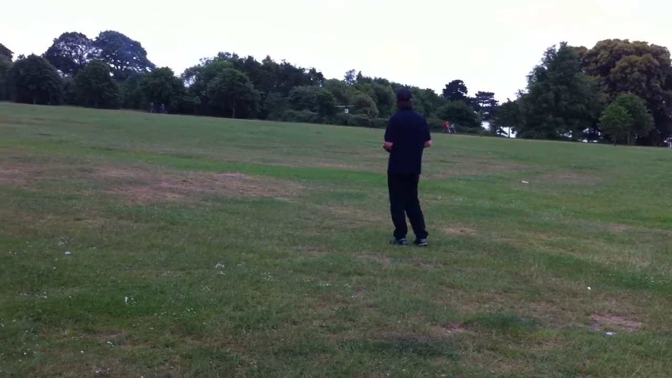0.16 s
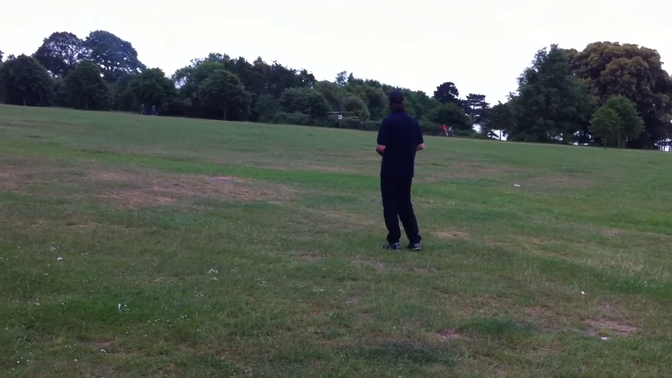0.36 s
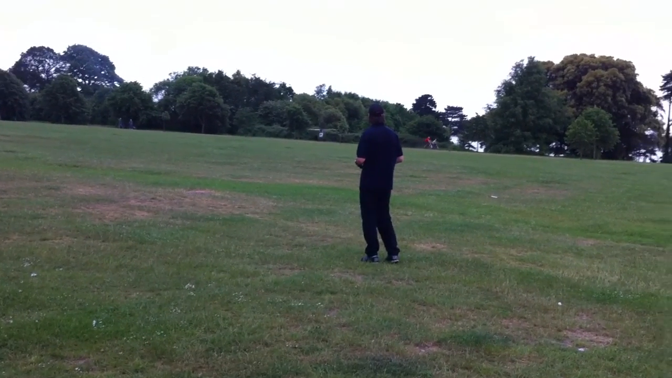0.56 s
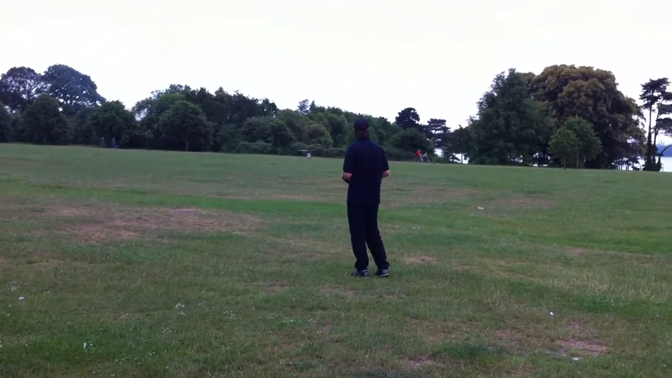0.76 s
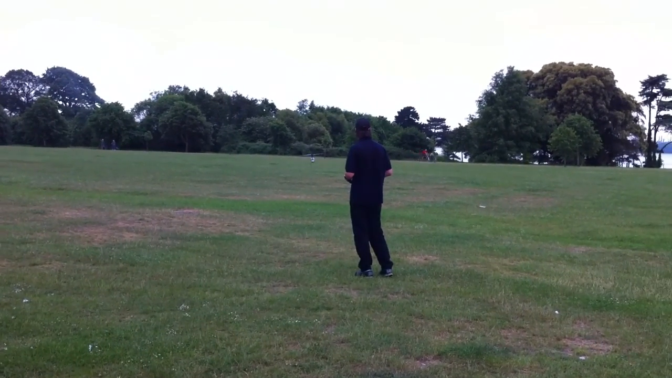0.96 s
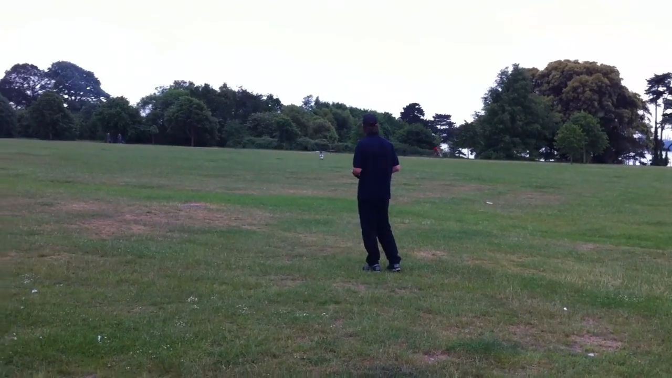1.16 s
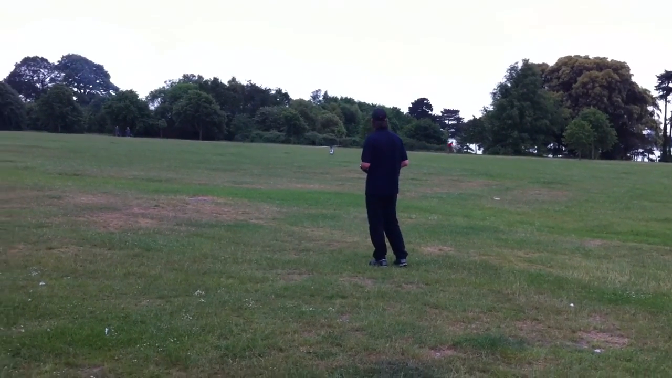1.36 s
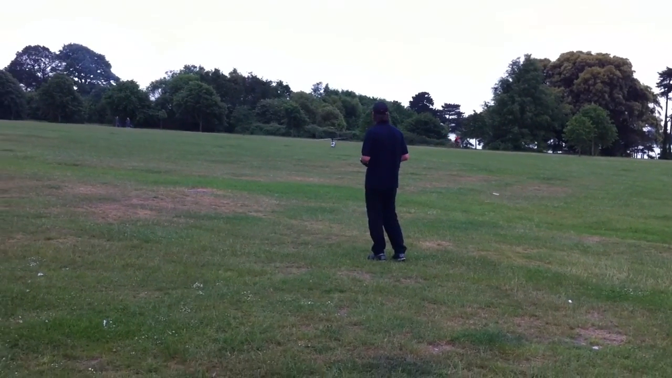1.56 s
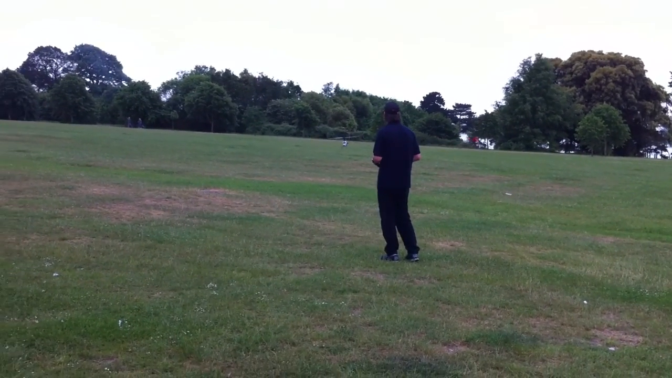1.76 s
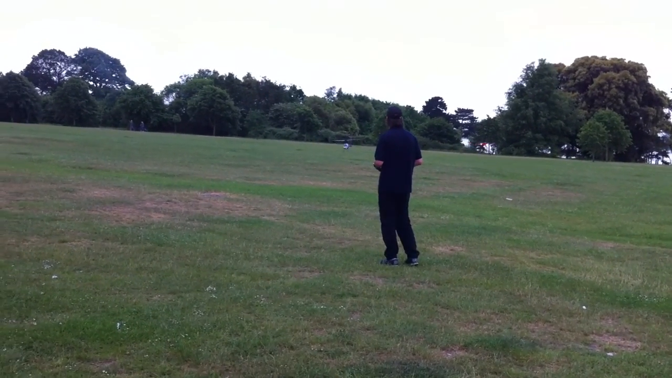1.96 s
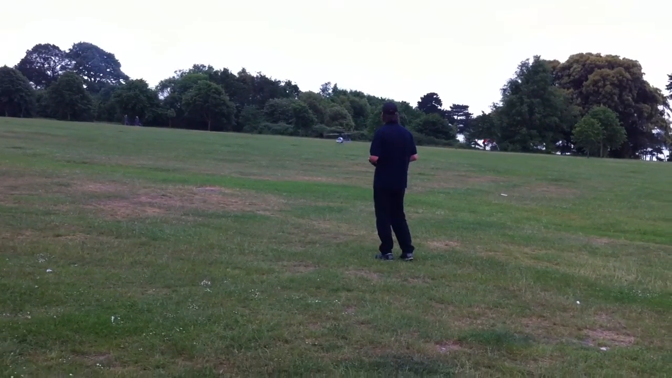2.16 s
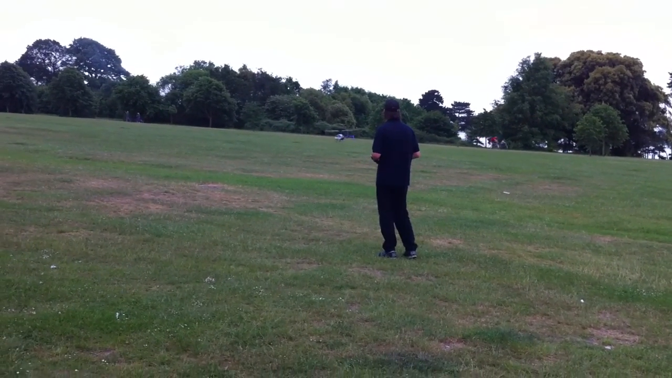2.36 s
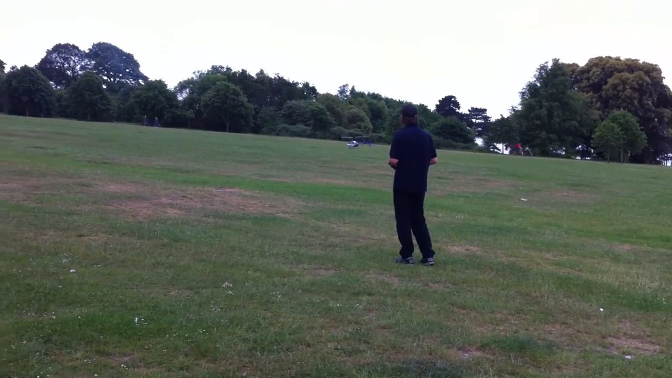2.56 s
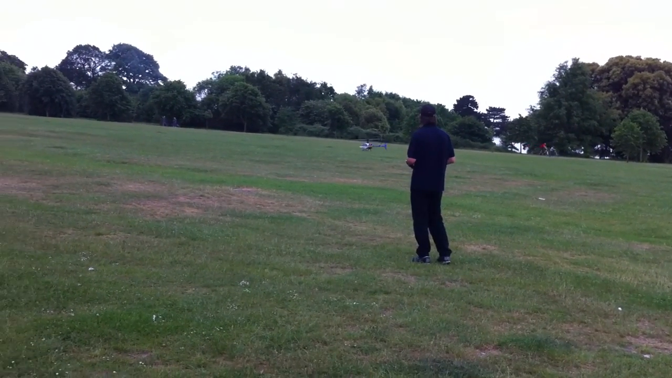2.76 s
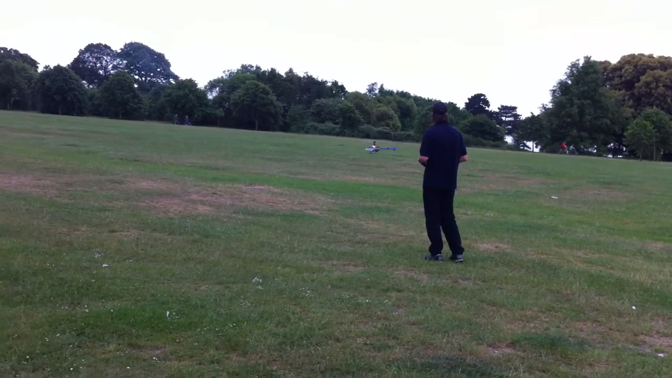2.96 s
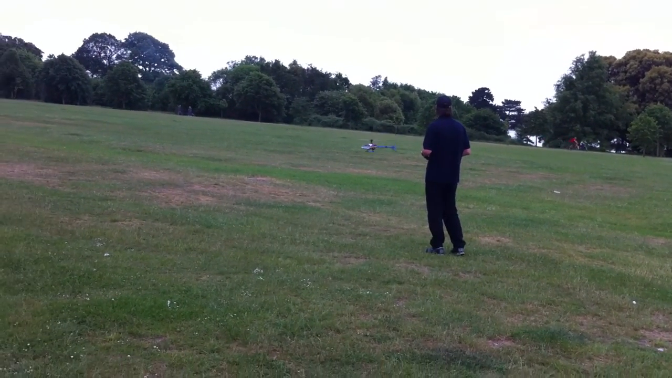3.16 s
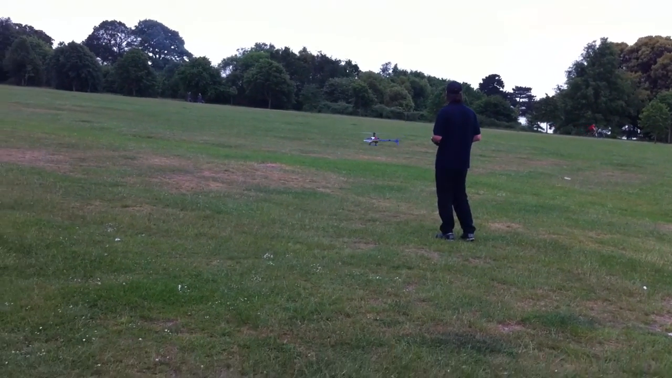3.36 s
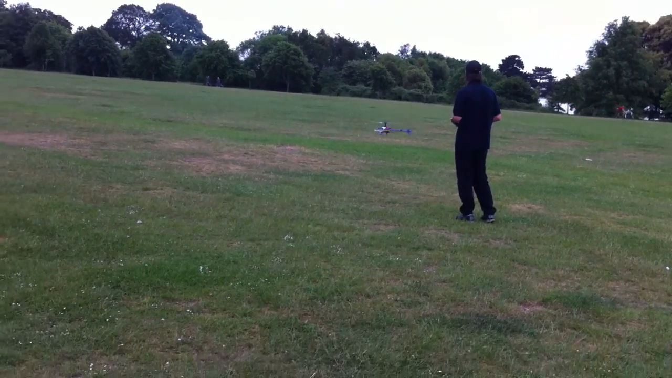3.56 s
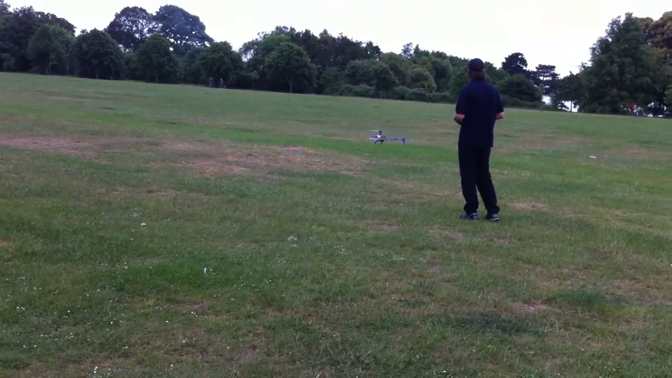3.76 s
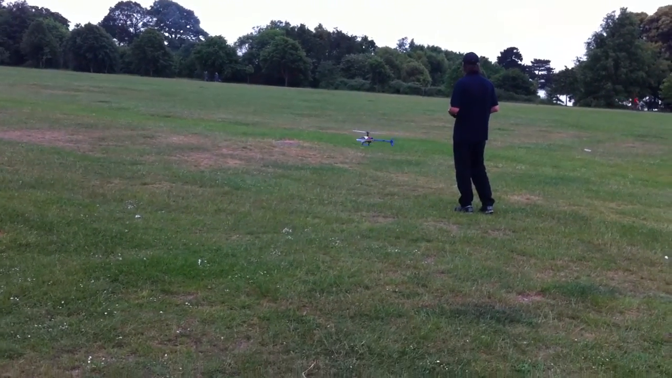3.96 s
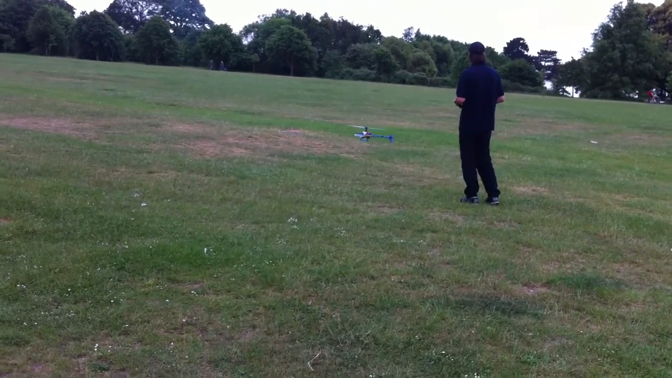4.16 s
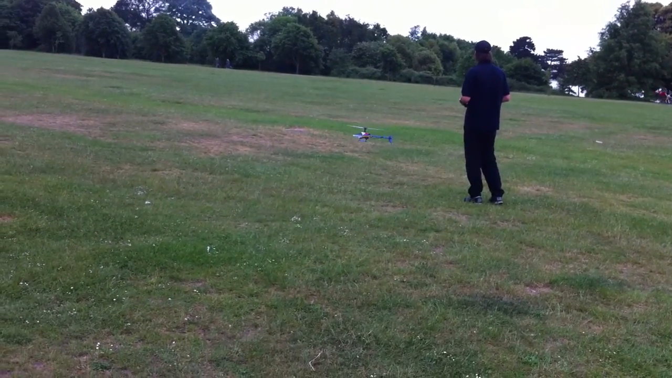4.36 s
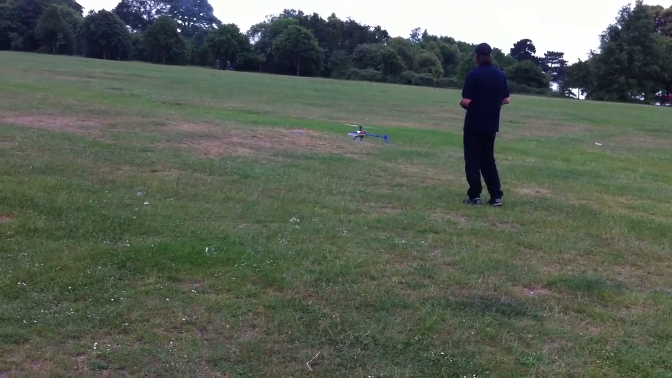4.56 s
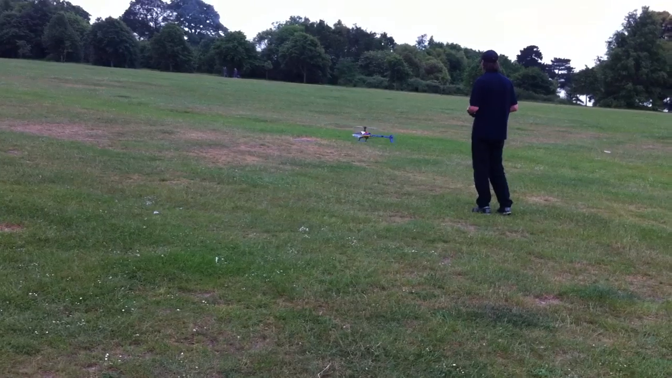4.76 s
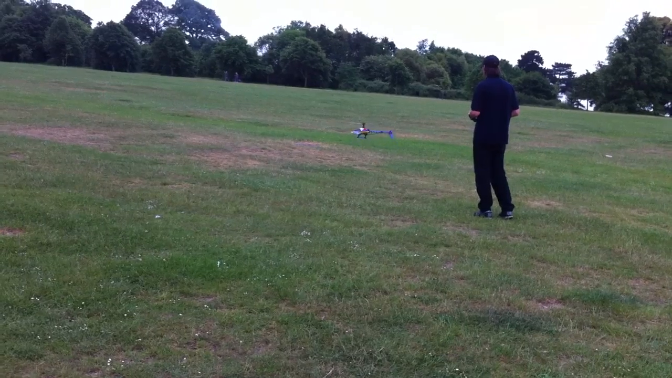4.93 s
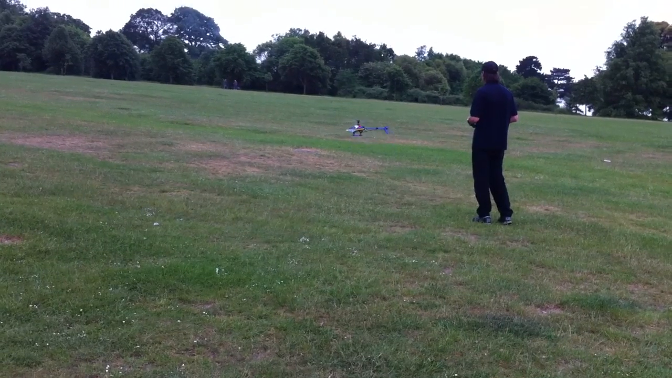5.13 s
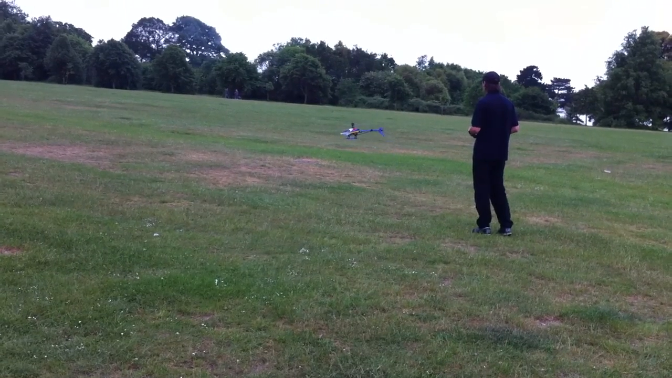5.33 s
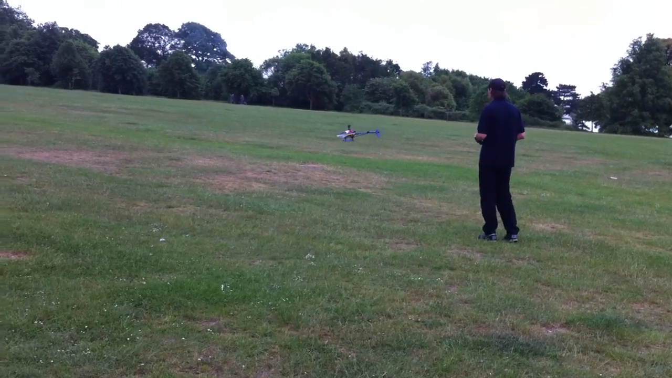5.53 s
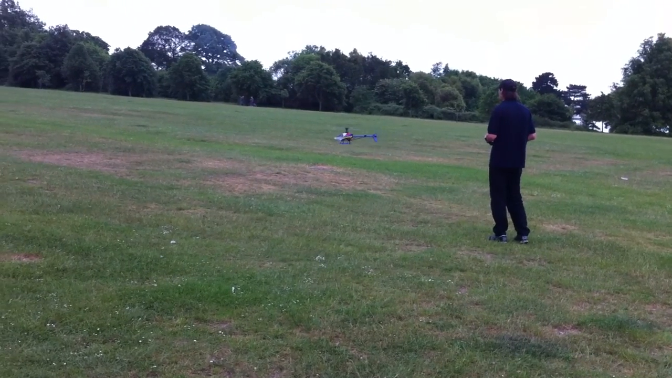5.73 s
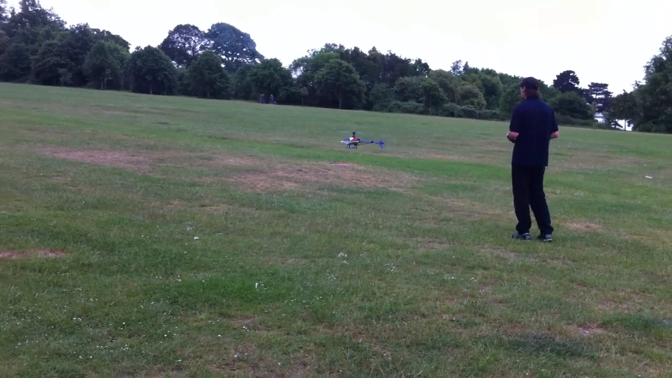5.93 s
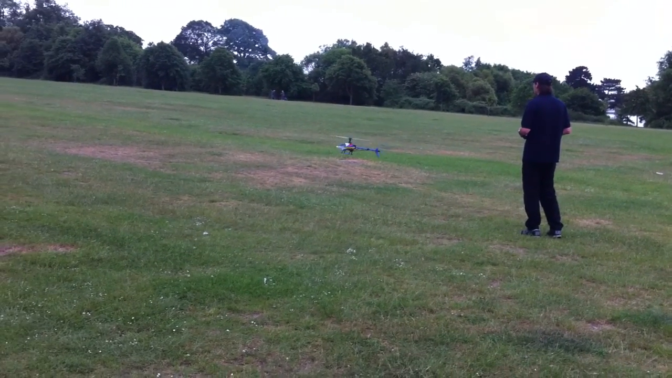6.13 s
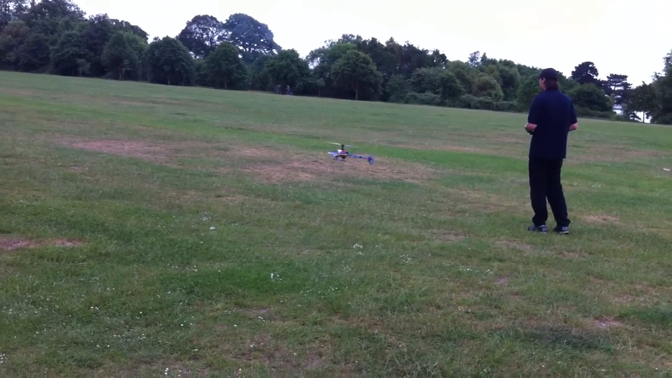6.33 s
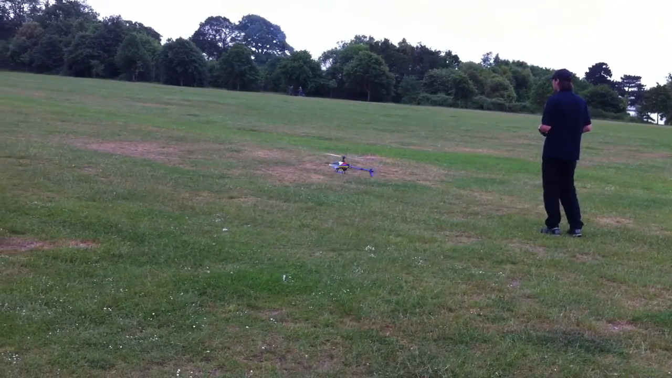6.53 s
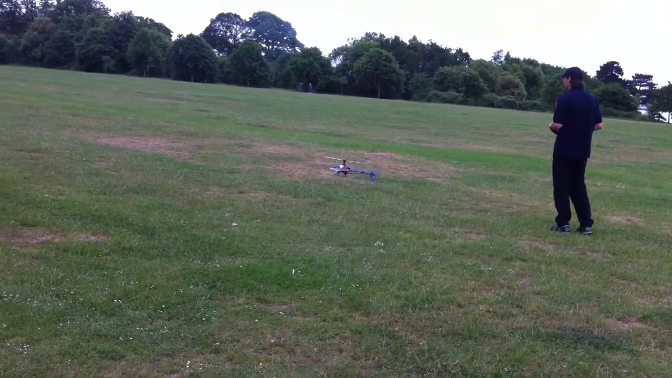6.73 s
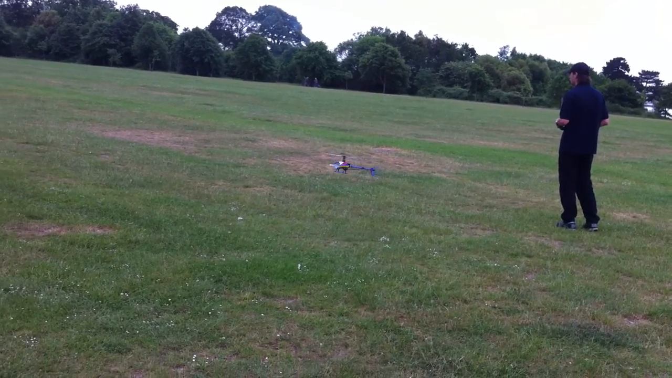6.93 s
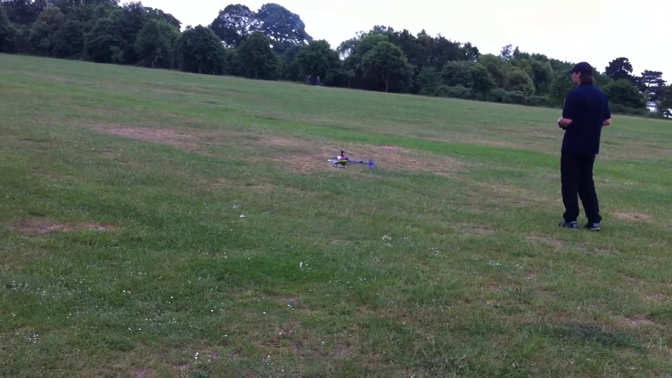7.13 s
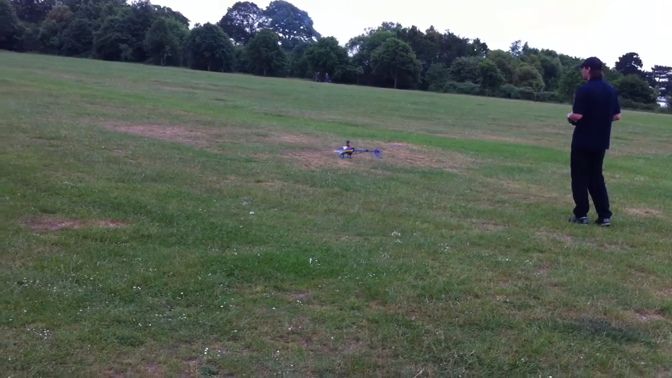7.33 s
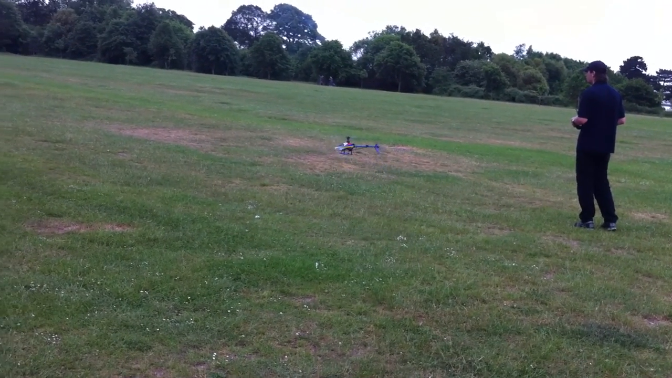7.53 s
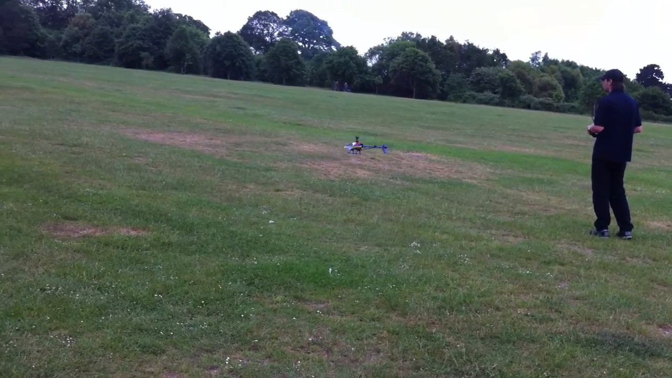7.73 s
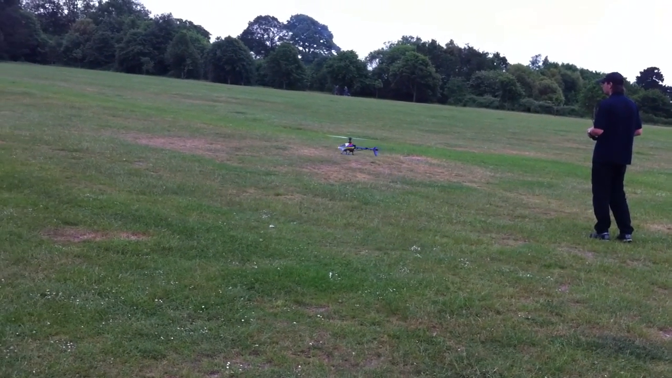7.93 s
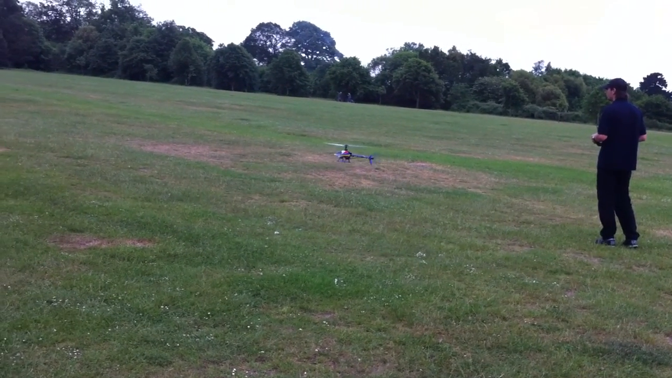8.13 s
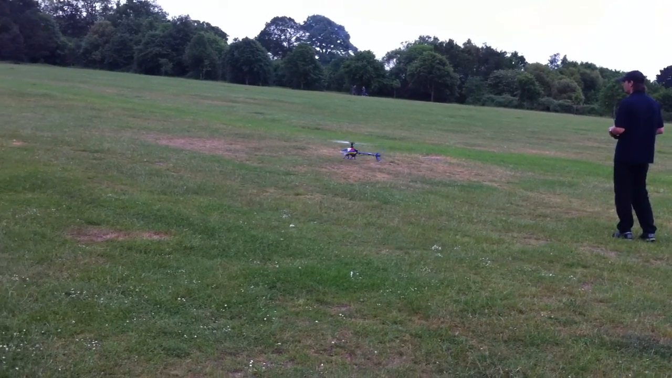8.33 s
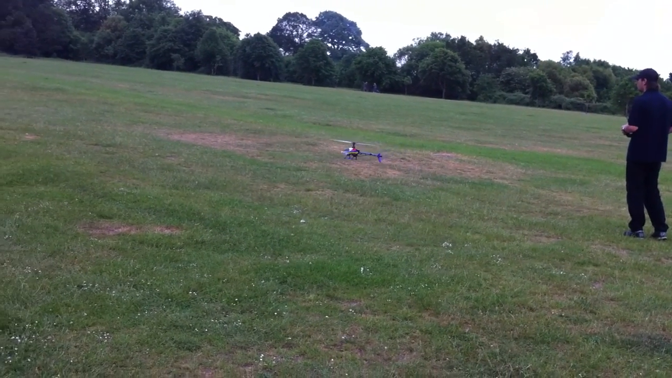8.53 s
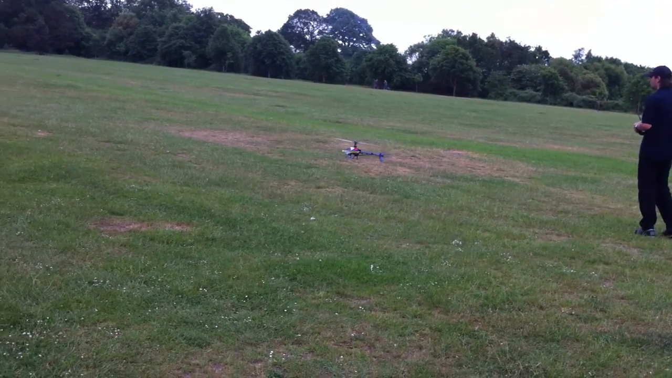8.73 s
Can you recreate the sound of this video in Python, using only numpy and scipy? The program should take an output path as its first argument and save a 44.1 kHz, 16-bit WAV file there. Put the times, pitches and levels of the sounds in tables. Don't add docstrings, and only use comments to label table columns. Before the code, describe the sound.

In an open park, a small electric model helicopter approaches and hovers. Its thin gear and motor whine starts distant and swells over several seconds, pitch wavering slightly, with rapid fluttering blade whistle, tail swish and dry gear rattle. Low far traffic lies underneath and a bird calls faintly near the start. A small handheld microphone gives a thin, slightly hollow sound.

```python
import sys
import numpy as np
from scipy import signal
from scipy.fft import rfft, irfft, next_fast_len
from scipy.io import wavfile
from scipy.ndimage import uniform_filter1d, map_coordinates

SR = 44100
rng = np.random.default_rng(int(sys.argv[2]) if len(sys.argv) > 2 else 0)


def boost(x):
    u = np.asarray(x, float) / 20
    return 10 ** u


def int16_out(signal):
    q = np.round(np.clip(np.atleast_2d(signal).T, -1, 1) * 32767)
    wavfile.write(sys.argv[1], SR, q.astype(np.int16))


N = 387638
T = np.arange(N) / SR

# (time [s], speed [turns/s], angle at which a blade points this way [turns])
ROTOR = [(0.0, 40.49, -0.068), (0.73, 40.36, -0.081), (1.05, 40.92, -0.07), (1.39, 41.12, -0.068),
         (2.11, 41.08, -0.103), (2.43, 40.5, -0.148), (3.21, 39.97, -0.248), (3.65, 40.27, -0.286),
         (3.96, 40.76, -0.27), (4.47, 41.25, -0.294), (4.83, 41.33, -0.298), (5.21, 40.64, -0.306),
         (5.97, 39.6, -0.308), (6.64, 40.67, -0.268), (7.32, 40.78, -0.311), (7.78, 40.66, -0.335),
         (8.14, 40.15, -0.335), (8.79, 40.32, -0.293)]
# (time [s], nearness [dB], 0 = closest)
NEARNESS = [(0, -12.5), (1, -9.5), (2, -9), (2.7, -4.5), (3.3, -2), (4.6, -1.5), (5.7, 1), (7, 0),
            (7.7, 0.86), (8.79, 0.5)]

ORDERS = {"tail": 5, "tail blades": 10, "tail buzz": 30, "tail third": 15, "tail fourth": 20,
          "tail rasp": 40, "tail sing": 200, "belt": 27,
          "motor": 14, "poles": 42, "slots": 56, "switching": 280, "switching low": 262,
          "mesh": 110, "mesh wobble": 111, "mesh less tail": 105, "mesh low": 104,
          "pinion low": 128, "pinion": 134, "pinion high": 140, "pinion top": 146}
TONES = {"tail": (-60.5, 1.13), "tail blades": (-62.5, 0.4), "tail buzz": (-74.5, 1.25),
         "tail third": (-77.5, 0.77), "tail fourth": (-75.5, 0.15), "tail rasp": (-67, 2.05),
         "tail sing": (-76, 1.1), "belt": (-78.5, 0.79),
         "motor": (-70, 1), "poles": (-67, 1.5), "slots": (-72, 2),
         "switching": (-62, 1.4), "switching low": (-68.5, 0.7),
         "mesh": (-49.5, 1.13), "mesh wobble": (-58.5, 0.86), "mesh less tail": (-64, 2.2),
         "mesh low": (-67, 0.55), "pinion low": (-56, 0.8), "pinion": (-55.5, 0.92),
         "pinion high": (-60.5, 0.47), "pinion top": (-65, 0.24)}
# (order [per turn], order followed [per turn], level relative to it [dB])
SIDEBANDS = [(12, 5, -18), (19, 10, -14), (28, 10, -14), (84, 42, -3), (115, 110, -14), (116, 110, -11),
             (109, 110, -18), (98, 110, -20), (286, 280, -8), (274, 280, -3)]
DRIVE_LOBES = {
    "tail": [(2.28, 0.89, -6.5), (5.65, 0.64, -4)],
    "tail blades": [(3.02, 0.6, -4), (5.7, 0.45, -10), (7.5, 0.29, -9.5), (8.5, 0.45, -11.5)],
    "tail buzz": [(2.9, 0.71, 9), (3.6, 0.32, 10.5), (5.3, 0.76, 13), (6.15, 0.28, 6),
                  (7.06, 0.33, -20), (8.48, 1, -39)],
    "motor": [(3.15, 0.9, -15), (6.11, 0.65, -12), (8.23, 0.46, -7)],
    "poles": [(1.28, 0.46, 6.5), (2.27, 0.15, -2), (3.65, 0.37, 5), (4.5, 0.28, -11), (7.96, 0.85, 3)],
    "slots": [(4.5, 0.99, 19), (6.67, 0.26, 14.5), (7.61, 0.58, 14.5), (8.7, 0.1, 15)],
    "switching": [(2.92, 0.12, -12.6), (4.4, 0.6, 2), (5.7, 0.3, -11), (8.33, 0.14, 1)]}
GEAR_LOBES = {
    "mesh": [(1.28, 0.31, -16), (2.5, 0.51, 6), (3.23, 0.25, -16.5), (4.1, 0.21, -8),
             (4.9, 0.19, -3.6), (6.47, 0.092, 5), (7.4, 0.13, -7)],
    "pinion low": [(0.35, 0.33, -23), (3.03, 0.42, -27), (5.72, 0.29, -5.9), (7.33, 0.12, -13),
                   (8.1, 0.16, -19)],
    "pinion": [(1.24, 0.087, -4), (2.9, 0.21, -21), (3.9, 0.17, 5), (4.57, 0.28, -3),
               (5.7, 0.25, -6), (6.7, 0.62, -8)],
    "pinion high": [(0.9, 0.13, -13), (1.95, 0.24, -4), (3.7, 0.42, -19), (4.9, 0.43, -12),
                    (8.28, 0.32, 5)]}
PARTNER_LOBES = {
    "mesh wobble": [(0.3, 0.65, 3), (1.3, 0.3, -12), (3.3, 0.24, -15), (4.4, 0.72, -18),
                    (7.3, 0.2, -13), (8.3, 0.94, 5.5)],
    "mesh less tail": [(2.3, 0.52, 19), (7.3, 0.92, 7)],
    "pinion top": [(1.6, 0.34, -10), (2.7, 0.4, 2), (4.7, 0.4, -6), (8.4, 0.4, 7)],
    "tail sing": [(2.9, 0.35, 18)],
    "tail third": [(4.6, 0.28, 4), (7.6, 1.2, 7.3)],
    "tail fourth": [(4.5, 0.36, 8.3), (5.6, 0.5, 6.9), (7.1, 0.33, 4.3)],
    "switching low": [(3.5, 0.8, -6), (5.4, 0.4, 5)],
    "mesh low": [(3.6, 0.64, -10), (4.6, 0.2, 7)],
    "belt": [(5.85, 0.4, 10.5)],
    "tail rasp": [(2.75, 0.28, 7), (3.6, 0.35, 11), (4.55, 0.25, -4)]}

# (time [s], blade load [dB], second blade over first [dB])
TIP_LOAD = [(0, 0, 5), (.6, 0, 5), (1, 3, 6), (1.7, 3.5, 5), (2.3, 2.5, 2.5), (3.1, -3.5, 10), (4, -.5, 6),
            (4.35, -1, 6), (4.75, 2.5, 6), (5.05, -1, 6), (5.5, 2, 4), (6, -2.5, 6), (6.4, -5, 7),
            (6.9, -2.5, 10), (7.35, 2, 6), (7.8, 1.5, 2), (8.25, -11.5, 7), (8.79, -4, 8)]
# (frequency on blade [Hz], width [Hz], level [dB])
FIRST_BLADE = [
    (9430, 97, -20),
    (9250, 500, -3),
]
# (frequency on blade [Hz], width [Hz], level [dB])
SECOND_BLADE = [
    (10000, 61.6, 3),
    (9620, 100, -3),
    (8820, 500, 0.5),
]
# (frequency [Hz], level [dB])
TIP_SPECTRUM = [(6300, -30.5), (9400, -23), (11000, -15.5), (12000, -21), (12500, -4.5), (14100, -2.5),
                (15000, -10), (15400, -12), (16000, -28)]

# (frequency [Hz], density [dB/Hz])
SWISH_SPECTRUM = [(410, -37), (700, -49), (803, -17), (1030, -13), (2310, -3.5), (2670, -8), (2900, -23),
                  (3770, -50), (6380, -120)]
# (frequency [Hz], density [dB/Hz])
RATTLE_SPECTRUM = [(1650, -90), (2800, -8.5), (3320, -7), (4420, -2.5), (5550, -7), (5970, -10.5),
                   (6310, -39), (6400, -40), (8320, -46), (14100, -120)]
# (frequency [Hz], density [dB/Hz])
AIRFLOW_SPECTRUM = [(5500, -32), (6300, -12), (6900, -9.5), (7800, -5), (9300, -5), (10400, -2.5),
                    (11500, 0), (12300, -6.5), (14000, -26), (16000, -75)]
# (time [s], half length [s], swish [dB], rattle [dB])
STEERING = [
    (2.5, 0.28, 5.5, 0),
    (3.3, 0.25, -2, 0.5),
    (3.806, 0.36, 2, 1),
    (4.497, 0.27, -1.5, 3),
    (5.85, 0.2, -1, -1.5),
    (6.55, 0.26, 3, 0.5),
    (6.97, 0.2, -2.5, 4),
    (7.7, 0.39, 0.5, -1.5),
    (8.146, 0.22, -1, 1),
]
# (time [s], delay [ms], strength [0-1])
GROUND = [(0, .825, .7), (.5, .78, .7), (.9, .703, .8), (1.1, .679, .85), (1.35, .666, .9),
          (1.6, .677, .82), (1.9, .713, .66), (2.4, .8, .25), (3, .85, .25), (3.3, .78, .4), (3.9, .42, .6),
          (4.2, .32, .6), (4.5, .275, .6), (4.8, .35, .5), (5.5, .86, .28), (6.1, .93, .2), (7, .7, .25),
          (8.79, .8, .2)]

# (time [s], level [dB])
TRAFFIC = [
    (0, -62.5),
    (3, -60.5),
    (4.5, -58.5),
    (8.79, -59.5),
]
# (frequency [Hz], density [dB/Hz])
PARK_SPECTRUM = [(20, -17), (50, -18), (80, -10.5), (165, 0), (250, -8), (340, -11), (800, -13),
                 (2000, -16), (2800, -26.5), (6000, -14.5), (16000, -58)]
# (time [s], length [s], start [Hz], end [Hz], level [dB])
BIRD = [
    (1.13, 0.15, 1920, 2180, -66),
    (1.37, .14, 2030, 1940, -67),
    (2.286, 0.18, 2120, 2030, -75),
]
# (frequency [Hz], half width [Hz], level [dB])
NOTCHES = [
    (2806, 308, -11.5),
    (6140, 170, -5.5),
    (6400, 75, -7),
    (9280, 146, -6.5),
    (11950, 120, -3),
    (12420, 225, -0.5),
]


def unit(x):
    return x / np.sqrt(np.mean(np.abs(x) ** 2) + 1e-20)


def curves(rows):
    time_s, *columns = np.transpose(rows)
    return [np.interp(T, time_s, column) for column in columns]


def wobble(rate_hz):
    knots = int(N * rate_hz / SR) + 4
    return np.interp(T * rate_hz, np.arange(knots), rng.standard_normal(knots))


def swells_db(rows, column=2):
    return sum(row[column] * np.exp(-((T - row[0]) / row[1]) ** 2) for row in rows)


def coloured(x, spectrum):
    m = next_fast_len(N + 8192)
    hz, db = np.transpose(spectrum)
    log_bins = np.log(np.fft.rfftfreq(m, 1 / SR) + 1)
    gain_db = np.interp(log_bins, np.log(hz + 1), db)
    return irfft(rfft(x, m) * boost(gain_db), m)[:N]


def patchy(patchy_db):
    z = signal.stft(rng.standard_normal(N), nperseg=512)[2]
    field = uniform_filter1d(rng.standard_normal(z.shape), 6, 0)
    field = uniform_filter1d(field, 20, 1)
    return signal.istft(z * boost(patchy_db * unit(field)), nperseg=512)[1][:N]


def repeating(turns):
    per_turn = 1100
    table = rng.standard_normal((int(turns[-1]) + 3, per_turn))
    table = uniform_filter1d(table, size=14, axis=0)
    return unit(np.interp(turns * per_turn, np.arange(table.size), table.ravel()))


def whine(turns, near_db):
    level_db = {}
    for name, lobes in (DRIVE_LOBES | GEAR_LOBES | PARTNER_LOBES).items():
        closest_db, growth = TONES[name]
        level_db[ORDERS[name]] = closest_db + growth * near_db + swells_db(lobes) + 0.42 * wobble(4)
    partners_db = {}
    for order, lead, db in SIDEBANDS:
        partners_db[round(order)] = level_db[round(lead)] + db + 2.2 * wobble(2.55)
    level_db.update(partners_db)
    out = np.zeros(N)
    for order, db in level_db.items():
        shake = np.sqrt(0.18 + order / 100)
        gain = boost(db + 1.25 * shake * wobble(18) + 3.5)
        phase_turns = order * turns + rng.random() + 0.07 * shake * wobble(25)
        out += gain * np.sin(2 * np.pi * phase_turns)
    return out


def blade(whistles, speed, angle, mach, beam, lean):
    emitted = angle
    for _ in range(5):
        emitted = angle + mach * np.sin(emitted)
    doppler = 1 / (1 - mach * np.cos(emitted))
    clock_s = np.cumsum(speed / 40.6 * doppler) / SR
    out = np.zeros(N)
    for hz, width_hz, db in whistles:
        gain = boost(db + 1.14 * wobble(45))
        jitter_turns = np.cumsum(width_hz * wobble(400)) / SR
        out += gain * np.sin(2 * np.pi * (hz * clock_s + jitter_turns))
    directivity = doppler ** beam * np.exp(-lean * np.sin(emitted))
    return unit(coloured(out * directivity, TIP_SPECTRUM))


def tips(speed, facing, near_db):
    load_db, second_db = curves(TIP_LOAD)
    first = blade(FIRST_BLADE, speed, 2 * np.pi * (facing - 0.04), mach=0.35, beam=2.7, lean=0.3)
    second = blade(SECOND_BLADE, speed, 2 * np.pi * (facing - 0.55), mach=0.34, beam=1.8, lean=0.69)
    blades = (first + boost(second_db) * second) / np.sqrt(1 + boost(2 * second_db))
    hiss = unit(coloured(patchy(patchy_db=3.0), TIP_SPECTRUM))
    whistle_db = -40.5 + load_db
    hiss_db = -46 + 0.15 * load_db - 0.6 * (second_db - second_db.mean())
    return boost(near_db) * (boost(whistle_db) * blades + boost(hiss_db) * hiss)


def tail_swish(speed, turns, near_db):
    crest_s, crest_rise_s, grass_dip_db = 2.94, 0.44, -16
    db_per_speed = -1
    hidden = (1 - np.tanh((T - crest_s) / crest_rise_s)) / 2
    level_db = -51.5 + 0.3 * near_db + grass_dip_db * hidden
    level_db = level_db + db_per_speed * (speed - speed.mean()) + swells_db(STEERING, 2)
    passes = np.zeros(N)
    for k in range(2, 7):
        tone = np.cos(2 * np.pi * (10 * k * turns + rng.random()))
        passes += boost(3 * wobble(1.5)) * wobble(110) * tone
    return boost(level_db) * unit(coloured(0.21 * unit(passes) + patchy(patchy_db=1.0), SWISH_SPECTRUM))


def gear_rattle(turns, near_db):
    level_db = -48.5 + 1.066 * near_db + swells_db(STEERING, 3)
    rattle = unit(coloured(0.55 * repeating(turns) + patchy(patchy_db=1.5), RATTLE_SPECTRUM))
    off_centre = 1 + 0.12 * np.cos(2 * np.pi * (turns + 0.28))
    return boost(level_db) * rattle * off_centre


def rotor_airflow(turns, facing, near_db):
    beat = 1 + 0.12 * np.cos(4 * np.pi * (facing + 0.022))
    flow = coloured(0.67 * repeating(turns) + patchy(patchy_db=2.0), AIRFLOW_SPECTRUM)
    return boost(-49 + near_db) * unit(beat * flow)


def over_grass(x, share):
    delay_ms, strength = curves(GROUND)
    bounce = map_coordinates(x, [np.arange(N) - delay_ms * SR / 1000], order=5)
    return (x + share * strength * bounce) / np.sqrt(1 + (share * strength) ** 2)


def park():
    level_db, = curves(TRAFFIC)
    return boost(level_db) * unit(coloured(patchy(patchy_db=1.06), PARK_SPECTRUM))


def bird():
    out = np.zeros(N)
    for start_s, length_s, from_hz, to_hz, db in BIRD:
        u = np.clip((T - start_s) / length_s, 0, 1)
        phase_turns = length_s * (from_hz * u + (to_hz - from_hz) * u * u / 2)
        out += boost(db) * np.sin(np.pi * u) * np.sin(2 * np.pi * phase_turns)
    return out


def scene():
    speed, heading = curves(ROTOR)
    near_db, = curves(NEARNESS)
    turns = np.cumsum(speed) / SR
    facing = turns - heading
    whistle = over_grass(tips(speed, facing, near_db), share=0.6)
    rush = tail_swish(speed, turns, near_db) + gear_rattle(turns, near_db)
    rush = over_grass(rush + rotor_airflow(turns, facing, near_db), share=0.096)
    mix = whine(turns, near_db) + whistle + rush + park() + bird()
    return mix[None]


def band_limit(x):
    return signal.sosfilt(signal.butter(12, 15940, fs=SR, output="sos"), x)


def record(dry):
    hz = np.fft.rfftfreq(N, 1 / SR)
    port_db = sum(db / (1 + ((hz - centre_hz) / width_hz) ** 2) for centre_hz, width_hz, db in NOTCHES)
    heard = irfft(rfft(dry) * boost(port_db), N)
    return band_limit(heard)


dry = scene()
out = record(dry)
int16_out(out)
```